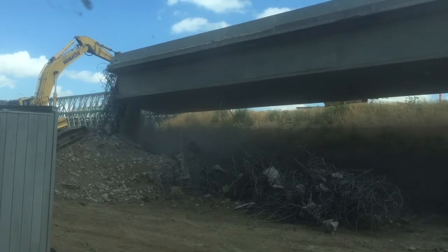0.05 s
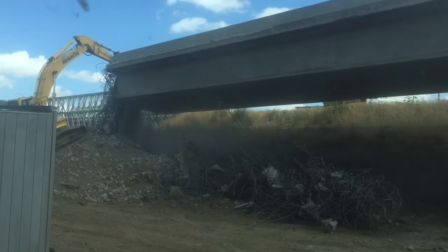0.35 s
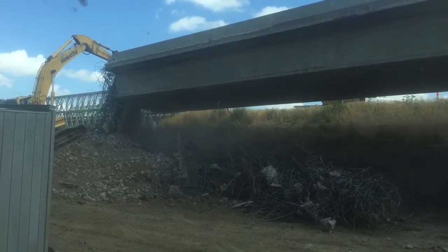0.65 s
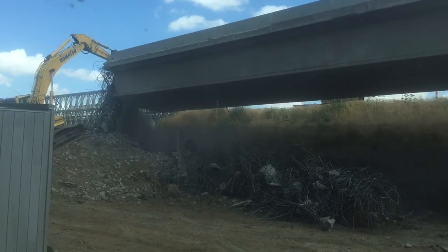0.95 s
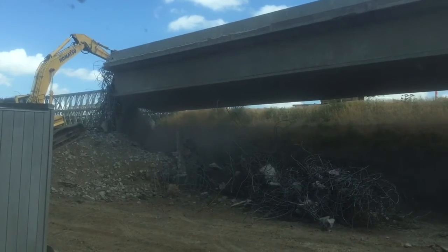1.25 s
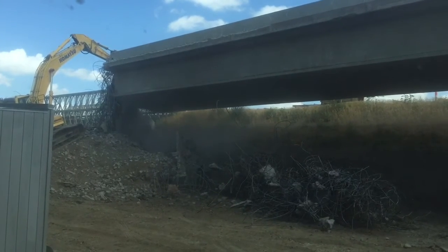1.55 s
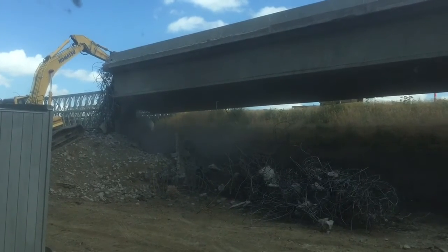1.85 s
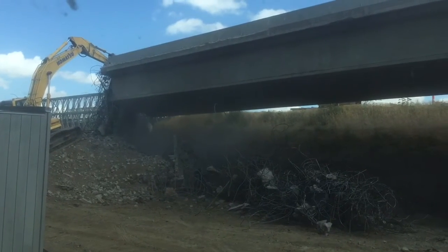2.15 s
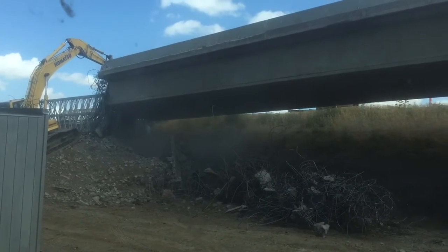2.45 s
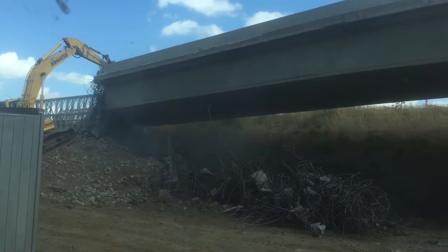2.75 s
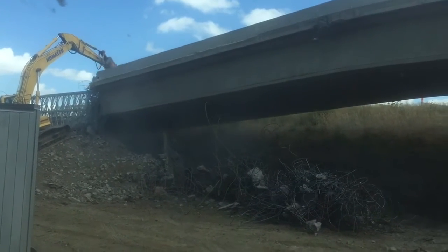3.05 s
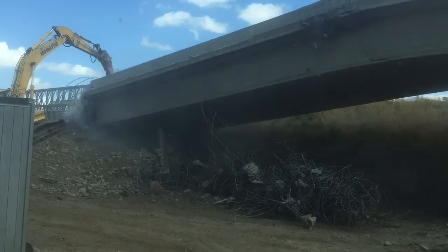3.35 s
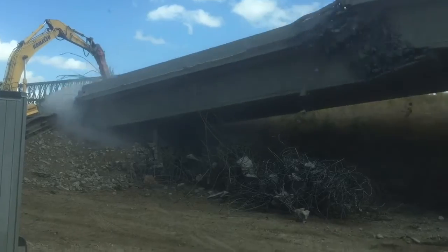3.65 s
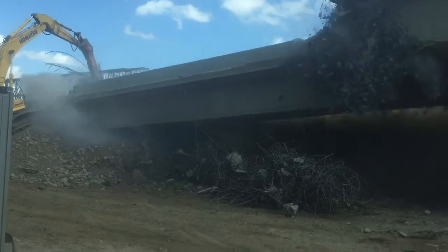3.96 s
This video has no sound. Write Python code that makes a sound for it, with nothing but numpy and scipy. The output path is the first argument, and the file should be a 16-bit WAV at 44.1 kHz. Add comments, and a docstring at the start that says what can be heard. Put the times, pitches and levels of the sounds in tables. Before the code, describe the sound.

A concrete bridge is demolished outdoors. A distant hydraulic breaker knocks rapidly and chips snap off, over a droning diesel engine and thin steel squeals. Then the span gives way, crumbling with a deep rumble and heavy thuds.

```python
"""A concrete bridge is knocked down: a distant hydraulic breaker pecks at it five times a second and chips
snap off. After about three seconds the span gives way, crumbling over a deep rumble as heavy pieces thud
down. All the while a big diesel engine drones, the machines roar, and dry steel rubs on steel,
singing thinly and now and then squealing."""
import sys
import numpy as np
from scipy import signal
from scipy.fft import rfft, irfft
from scipy.io import wavfile
from scipy.ndimage import uniform_filter1d

SR = 44100
rng = np.random.default_rng(int(sys.argv[2]) if len(sys.argv) > 2 else 0)


def generate_wav(signal):
    """Clip the signal to [-1, 1] and save it as 16-bit WAV at the path in sys.argv[1]."""
    frames = np.transpose(np.atleast_2d(signal))
    scaled = np.clip(frames, -1, 1) * 32767
    pcm = np.round(scaled).astype(np.int16)
    wavfile.write(sys.argv[1], SR, pcm)


N = 176400  # four seconds

ARM_HZ = 1147.5  # the note of the breaker's arm, also heard in the crumbling
# The deep sound of falling concrete. Each row: frequency in Hz, relative level in dB.
RUMBLE_SPECTRUM = [(25, -30), (50, -31), (85, 0), (125, -1), (190, -8.5), (300, -21), (600, -34),
                   (2000, -60)]


def undb(db):
    """Turn decibels into a factor to multiply a sound by."""
    return 10 ** (np.asarray(db) / 20)


def unit(x):
    """Scale a signal to an average strength (rms) of 1."""
    return x / np.sqrt(np.mean(x ** 2))


def clock():
    """The time of every sample in seconds."""
    return np.arange(N) / SR


def noise():
    """White noise: an even hiss."""
    return rng.standard_normal(N)


def wander(per_s):
    """A smooth random curve of strength 1 that heads for a new value per_s times a second."""
    hold = int(SR / per_s)
    steps = np.repeat(noise()[:N // hold + 1], hold)
    return unit(uniform_filter1d(uniform_filter1d(steps, hold), hold)[:N])


def colour(x, spectrum):
    """Filter x by a curve of (Hz, dB) points, then scale it to strength 1."""
    hz, db = np.array(spectrum).T
    freqs = np.maximum(np.fft.rfftfreq(N, 1 / SR), 1)
    gain = undb(np.interp(np.log(freqs), np.log(hz), db))
    return unit(irfft(rfft(x) * gain, N))


def ring(hz, width_hz):
    """Noise ringing around one pitch, at strength 1; the narrower, the purer the note."""
    freqs = np.fft.rfftfreq(N, 1 / SR)
    return unit(irfft(rfft(noise()) / (1 + ((freqs - hz) / width_hz) ** 2), N))


def tone(hz):
    """A pure tone of strength 1 that follows a pitch curve."""
    return np.sqrt(2) * np.sin(2 * np.pi * (np.cumsum(hz) / SR + rng.random()))


def strikes(starts, levels_db, rise_s, fade_s):
    """The loudness curve of some hits: each rises quickly, then drops 60 dB in fade_s."""
    t, power = clock(), 0
    for start, db in zip(starts, levels_db):
        rise = np.clip((t - start) / rise_s, 0, 1)
        fade = np.exp(-np.log(1000) * np.maximum(t - start - rise_s, 0) / fade_s)
        power = power + (undb(db) * rise * fade) ** 2
    return np.sqrt(power)


def grit(per_s, spread_db):
    """Many tiny clicks of unequal size at random times."""
    clicks = (rng.random(N) < per_s / SR) * rng.choice([-1, 1], N)
    return clicks * undb(spread_db * np.minimum(rng.exponential(size=N), 4))


def machines(firing_hz):
    """Exhaust, fans and hydraulics merge into a roar; its bass flickers, the rest pulses with the engine."""
    # The roar. Each row: frequency in Hz, relative level in dB.
    roar_spectrum = [(25, -82), (46, 0), (62, -9.5), (80, 0.5), (115, 2), (165, 0), (200, -7.5), (290, -10),
                     (410, -17.5), (500, -18.5), (635, -13.5), (730, -17), (820, -19.5), (940, -16.5),
                     (1080, -24), (1600, -27), (2100, -32), (3200, -32.5), (4900, -41.5), (6200, -39.5),
                     (9000, -42), (10200, -47.5), (13500, -51), (16000, -53)]
    roar = colour(noise(), roar_spectrum)
    bass = signal.sosfiltfilt(signal.butter(2, 180, fs=SR, output="sos"), roar)  # below 180 Hz
    chuff = 1 + 0.092 * tone(firing_hz) / np.sqrt(2)
    flicker = undb(0.44 * wander(25.66))
    return undb(-27) * (bass * flicker + (roar - bass) * chuff)


def housing():
    """The engine's housing rings steadily at one pitch."""
    return undb(-46.5) * ring(629.4, width_hz=16)


def diesel(firing_hz):
    """The engine's firings make a low hum with overtones that waver in loudness."""
    # The overtones. Each row: multiple of the firing rate, level in dB relative to the lowest tone.
    overtones = [(2, -13), (3, -11.5), (4, -17), (5, -11.5), (6, -13.5), (7, -17.5), (8, -18), (10, -18)]
    hum = tone(firing_hz) * undb(wander(10))
    for multiple, db in overtones:
        hum = hum + undb(db) * tone(multiple * firing_hz) * (1 + 0.14 * wander(14))
    return undb(-29) * hum


def rubbed_note(hz, width_hz):
    """One note of rubbed steel: a trembling, flickering tone with a little noise around it."""
    tone_share, flicker_db = 0.75, 2
    held = tone(hz + 0.45 * width_hz * wander(100))
    note = np.sqrt(tone_share) * held + np.sqrt(1 - tone_share) * ring(hz, width_hz)
    return note * undb(flicker_db * wander(18))


def steel():
    """Dry steel rubs and sings in many thin notes; now and then one catches and squeals."""
    # The steel's own notes. Each row: pitch in Hz, width in Hz, base level in dB.
    notes = [(3440, 8, -74), (6735, 36, -61.5), (7483, 25, -68.5), (7973, 14, -69), (8398, 12, -75),
             (8651, 18, -65), (8972, 16, -66), (9110, 14, -68), (9170, 45, -67), (10261, 16, -76),
             (10406, 18, -75), (10756, 14, -73), (11423, 25, -76), (12877, 22, -74.5), (12990, 45, -76),
             (14675, 30, -76)]
    # How the singing swells. Each row: time in seconds, relative level in dB.
    rubbing = [(0, -1.5), (.35, 2), (.6, -4), (.95, 3.5), (1.17, -2), (1.45, 4.5), (1.57, 1), (1.73, 5.5),
               (2.0, -1), (2.25, -1.5), (2.55, 4), (2.8, 0), (2.96, 3), (3.12, -2), (3.45, 4), (3.7, -2),
               (4.0, 1)]
    # The squeals. Each row: middle in seconds, length in seconds, pitch in Hz, level in dB.
    squeals = [(0.335, 0.25, 8972, -52), (.3, 0.26, 9110, -58), (0.207, .06, 10406, -57),
               (.33, 0.22, 10406, -58), (.48, .08, 6735, -58), (1.21, .04, 3440, -57),
               (1.44, 0.07, 6735, -56), (1.47, .06, 8651, -58), (1.737, 0.07, 8972, -53.5),
               (1.843, .09, 3440, -54), (1.9, 0.06, 6735, -49.5), (2.23, 0.09, 6735, -52.5),
               (2.325, .05, 6735, -52), (2.44, 0.155, 3440, -47), (2.61, 0.2, 6735, -54),
               (2.54, 0.08, 8972, -53.5), (2.55, .09, 10261, -56.5), (2.5, .09, 10756, -60),
               (2.65, 0.07, 3440, -53), (2.95, 0.1, 8972, -59), (3.205, 0.08, 3440, -52.5),
               (3.34, 0.075, 8651, -57.5), (3.47, 0.12, 8972, -59), (3.46, .1, 6735, -56),
               (3.925, .05, 6735, -53)]
    t = clock()
    rubbing_db = 2 + np.interp(t, *np.array(rubbing).T)
    out = sum(undb(db + rubbing_db) * rubbed_note(hz, width_hz) for hz, width_hz, db in notes)
    for middle, length, hz, db in squeals:
        swell = np.exp(-abs(2 * (t - middle) / length) ** 3)
        roughness = hz / 9000  # high notes are gripped less evenly
        flutter_db = roughness * 2.4 * wander(90)
        shaky_hz = hz * (1 + roughness * 0.0022 * wander(400))
        out = out + undb(db + flutter_db) * swell * tone(shaky_hz)
    return out


def scrape():
    """A second rubbing spot sings two close notes and swells on its own."""
    # The two notes. Each row: pitch in Hz, width in Hz, base level in dB.
    notes = [(5665, 40, -64), (5768, 20, -62)]
    # How the scrape swells. Each row: time in seconds, added level in dB.
    rubbing = [(0, -1), (.27, 2.5), (.68, -5), (.85, -1.5), (1.1, -2), (1.4, 2.5), (1.58, 1), (1.75, 4.5),
               (2.0, -.5), (2.6, 1), (2.83, -4), (3.1, 1), (3.52, 3), (3.7, -2), (4.0, 1)]
    swell = undb(np.interp(clock(), *np.array(rubbing).T))
    return swell * sum(undb(db) * rubbed_note(hz, width_hz) for hz, width_hz, db in notes)


def cracks():
    """Concrete breaks with short gritty snaps; each chip clacks at its own pitch."""
    # The snaps. Each row: start in seconds, snap level in dB, chip pitch in Hz, clack level in dB.
    snaps = [(.089, -50, 3200, -50), (0.329, -42, 3000, -46), (.499, -44, 3300, -53),
             (0.628, -45, 3800, -48), (1.012, -44, 3400, -55), (1.232, -45, 2700, -43),
             (1.249, -49, 1800, -44), (1.549, -45, 3300, -52), (1.615, -47, 2900, -50),
             (1.873, -41, 4200, -48), (2.216, -44, 4300, -57), (2.389, -40, 4200, -52),
             (2.562, -40, 3700, -49), (3.232, -38, 2500, -47), (3.332, -49, 3100, -45),
             (3.423, -36, 1900, -41), (3.442, -38, 2660, -44), (3.455, -42, 5750, -50),
             (3.569, -40, 5500, -46), (3.680, -50, 3800, -46), (3.748, -45, 1600, -35),
             (3.770, -45, 3000, -41), (3.779, -47, 1640, -37), (3.962, -49, 2200, -40)]
    # The bright sound of a snap. Each row: frequency in Hz, relative level in dB.
    snap_spectrum = [(400, -22), (1500, -8), (3500, -8), (6500, -16), (10000, -25), (16000, -38)]
    starts, snap_db, pitches, clack_db = np.array(snaps).T
    crackle = colour(grit(per_s=13000, spread_db=1.9), snap_spectrum)
    out = crackle * strikes(starts, snap_db, rise_s=0.001, fade_s=0.05)
    for start, hz, db in zip(starts, pitches, clack_db):
        out = out + ring(hz, width_hz=230) * strikes([start], [db], rise_s=0.001, fade_s=0.07)
    return out


def breaker():
    """Each blow knocks on the concrete and sets the breaker's chisel and arm ringing."""
    # The blows. Each row: start in seconds, knock level in dB, chisel level in dB.
    blows = [(.085, -40.5, -54), (.252, -44, -41), (.432, -38.5, -44), (0.621, -36, -45),
             (0.812, -38.5, -48), (1.008, -38, -58), (1.226, -38, -52), (1.44, -39, -62), (1.614, -36, -62),
             (1.815, -38, -60), (1.989, -38, -63), (2.195, -38, -51), (2.375, -54, -54), (2.57, -54, -67),
             (2.8, -46, -63)]
    # The sound of a knock. Each row: frequency in Hz, relative level in dB.
    knock_spectrum = [(200, -49), (400, 10), (650, 14.5), (950, 5), (1300, 3.5), (1800, -2.5), (3200, -3.5),
                      (6000, -12), (12000, -27)]
    chisel_hz, waver_hz, rise_s = 1933, 17.5, 0.006
    starts, knock_db, chisel_db = np.array(blows).T
    knock = colour(noise(), knock_spectrum) * strikes(starts, knock_db, rise_s, fade_s=0.28)
    chisel = tone(chisel_hz + waver_hz * wander(200)) * strikes(starts, chisel_db, rise_s, fade_s=0.1)
    arm = ring(ARM_HZ, width_hz=25) * strikes(starts, knock_db - 7.5, rise_s, fade_s=0.48)
    return knock + chisel + arm


def collapse():
    """The span gives way, crumbling into countless chips over a deep rumble."""
    # The course of the fall. Each row: time in seconds, crumbling level in dB, rumble level in dB.
    stages = [(2.9, -53, -57), (3.15, -43, -35), (3.36, -39, -25.5), (3.44, -36.5, -24), (3.51, -37, -30.5),
              (3.575, -37.5, -24), (3.65, -36.5, -27), (3.77, -34, -22), (3.88, -38.5, -31),
              (4.0, -34.5, -46)]
    # The sound of crumbling. Each row: frequency in Hz, relative level in dB.
    crumble_spectrum = [(200, -38), (600, 9), (1150, 1), (1800, -1.5), (3200, -5.5), (5500, -12),
                        (8000, -20), (16000, -34)]
    t = clock()
    times, crumble_db, rumble_db = np.array(stages).T
    chips = colour(grit(per_s=500, spread_db=3), crumble_spectrum)
    dust = 0.9 * colour(noise(), crumble_spectrum)
    ringing = 0.47 * ring(ARM_HZ, width_hz=8.6)
    flicker_db = 1.1 * wander(60)
    crumble = unit(chips + dust + ringing) * undb(np.interp(t, times, crumble_db) + flicker_db)
    rumble = colour(noise(), RUMBLE_SPECTRUM) * undb(np.interp(t, times, rumble_db))
    return (crumble + rumble) * (t > times[0])


def slabs():
    """Heavy pieces break and land, each with a deep, wobbly thud and a dense crunch."""
    # The pieces. Each row: start in seconds, thud pitch in Hz, thud level in dB, crunch level in dB.
    pieces = [(0.111, 135, -29, -39.5), (.795, 145, -28.5, -42.5), (2.245, 112, -24, -38),
              (3.185, 125, -24, -32), (3.385, 170, -24, -38), (3.418, 88, -19, -42), (3.55, 88, -24, -39),
              (3.730, 189, -28.5, -27), (3.753, 90, -17, -29), (3.785, 170, -21, -28.5),
              (3.820, 100, -19.5, -30), (3.934, 100, -23, -33)]
    # The sound of a crunch. Each row: frequency in Hz, relative level in dB.
    crunch_spectrum = [(100, -22), (200, 7), (280, -1), (420, -1), (700, 1), (950, -2.5), (1300, -18.5),
                       (4000, -36), (12000, -59)]
    out = 0
    for start, hz, thud_db, crunch_db in pieces:
        wobbly_hz = hz * (1 + 0.12 * wander(90))
        thud = tone(wobbly_hz) + undb(-1) * colour(noise(), RUMBLE_SPECTRUM)
        crunch = colour(grit(per_s=4000, spread_db=0.88), crunch_spectrum)
        out = out + thud * strikes([start], [thud_db], rise_s=0.012, fade_s=0.22)
        out = out + crunch * strikes([start], [crunch_db], rise_s=0.012, fade_s=0.53)
    return out


def scene():
    """Add the engine, the demolition work and the rubbing steel into one channel."""
    firing_hz = 34.77 * (1 + 0.00302 * wander(5))  # the engine's speed drifts a little
    engine = housing() + diesel(firing_hz) + machines(firing_hz)
    return (engine + breaker() + cracks() + steel() + scrape() + collapse() + slabs())[None]


def record(dry):
    """Cut away the very highest treble."""
    top_hz = 15700
    return signal.sosfilt(signal.ellip(10, 0.2, 80, top_hz, fs=SR, output="sos"), dry)


dry = scene()
out = record(dry)
generate_wav(out)
```